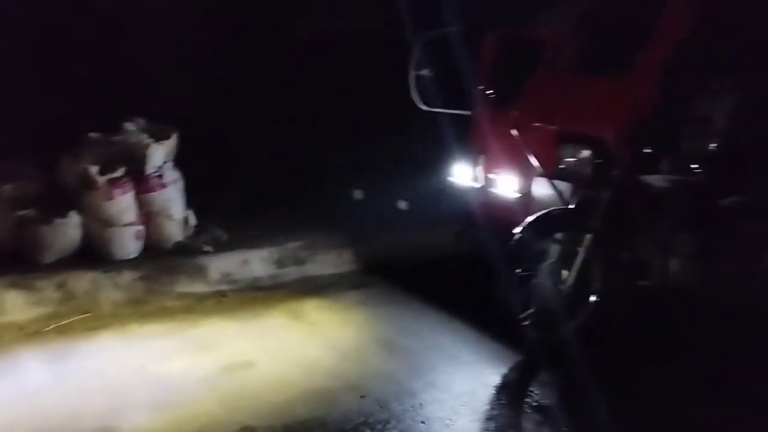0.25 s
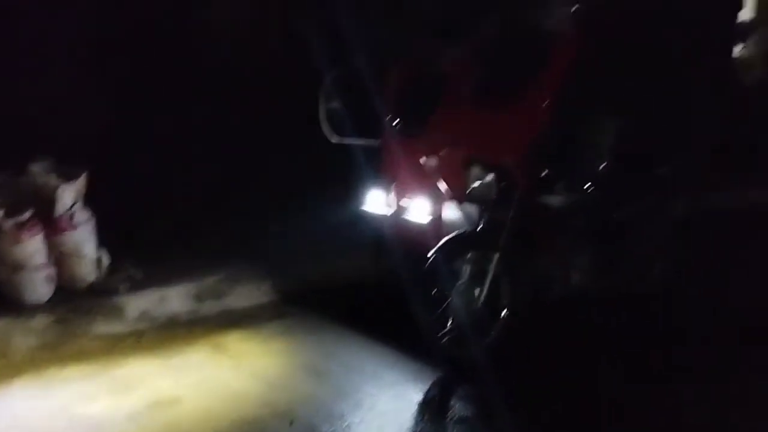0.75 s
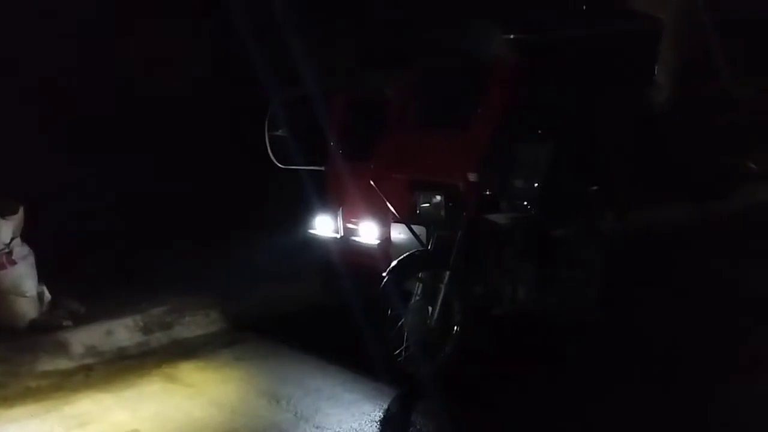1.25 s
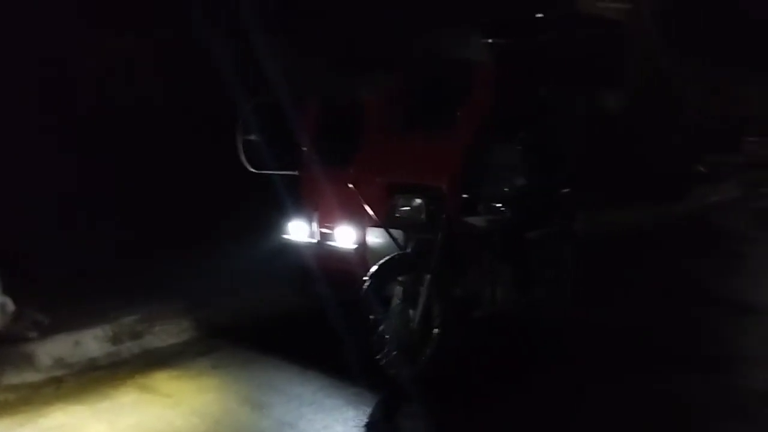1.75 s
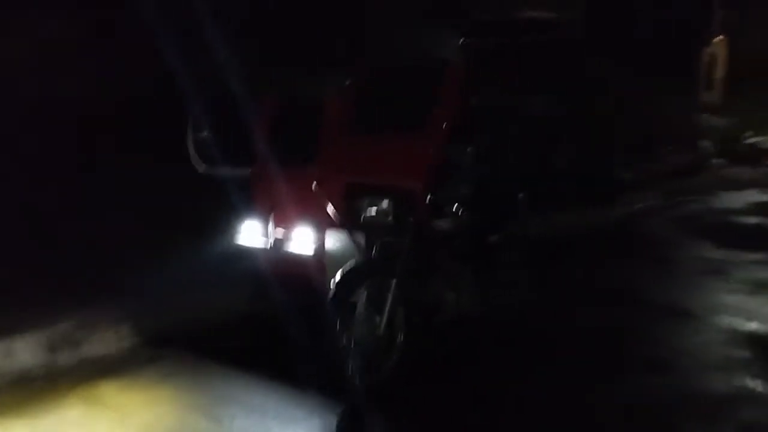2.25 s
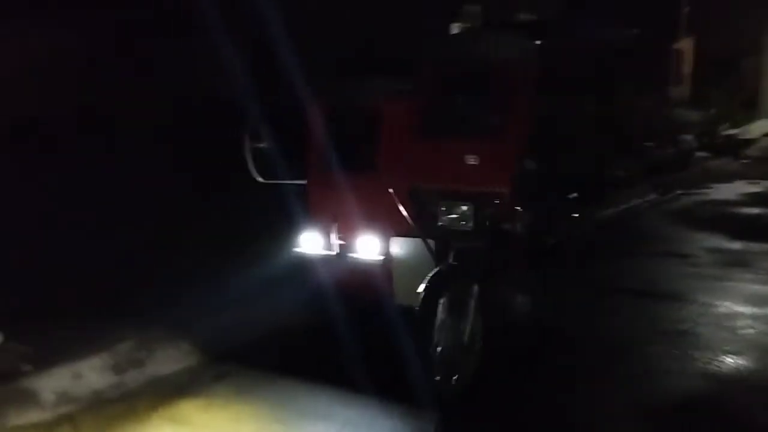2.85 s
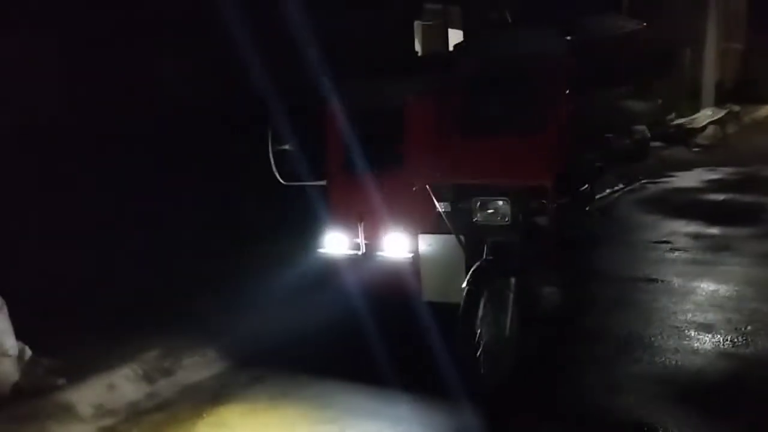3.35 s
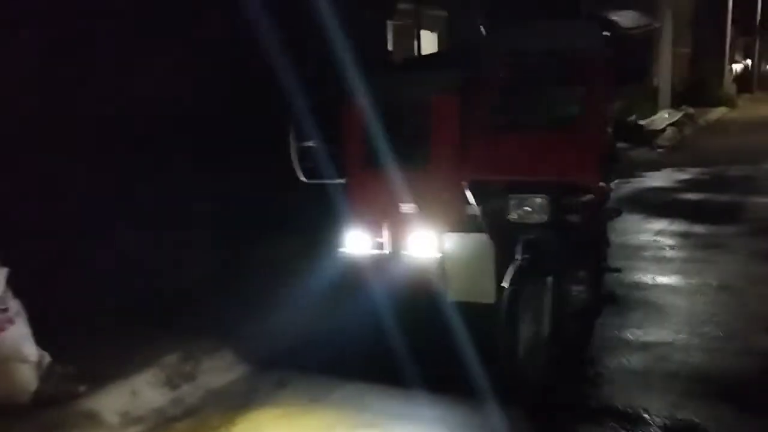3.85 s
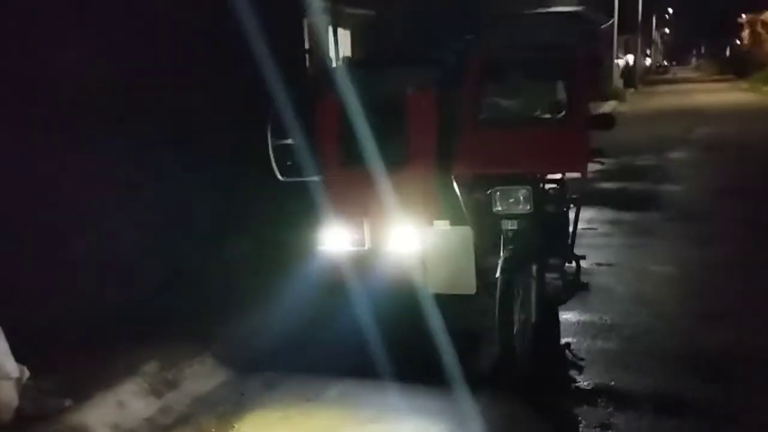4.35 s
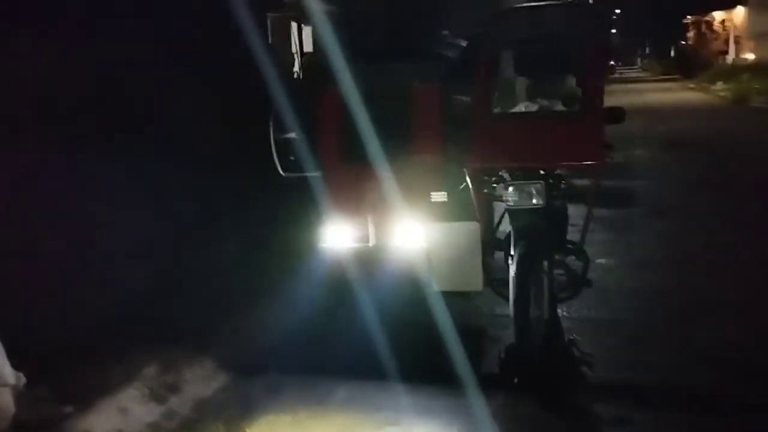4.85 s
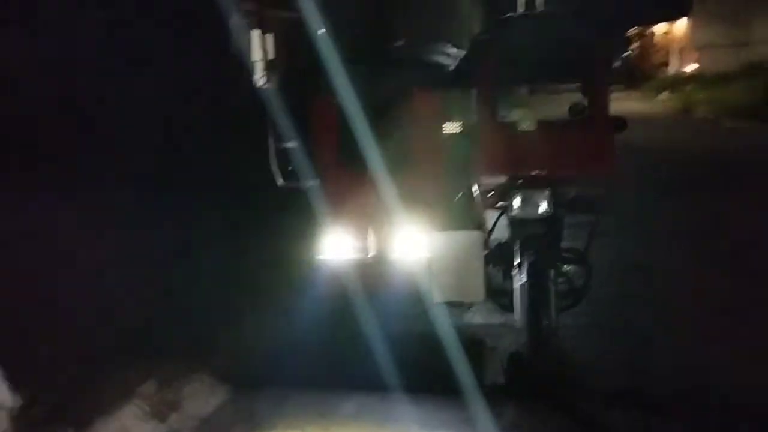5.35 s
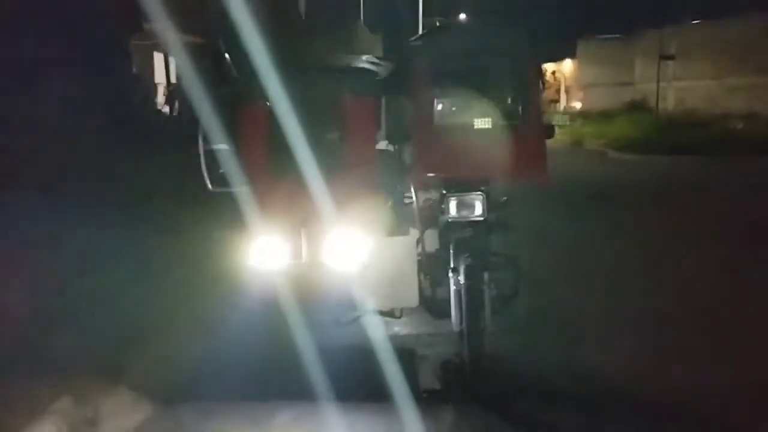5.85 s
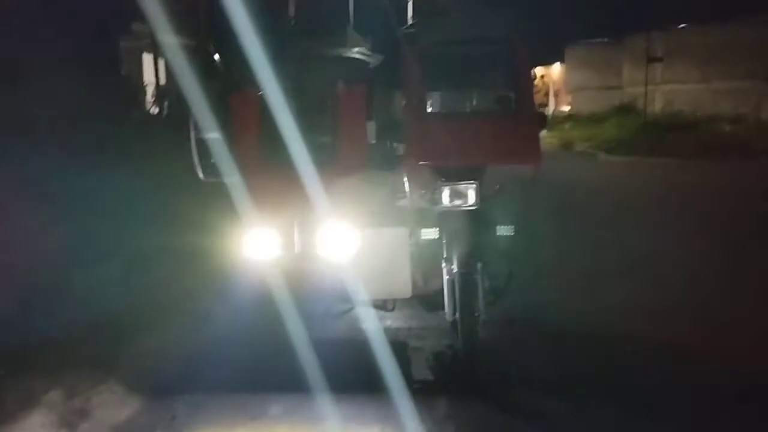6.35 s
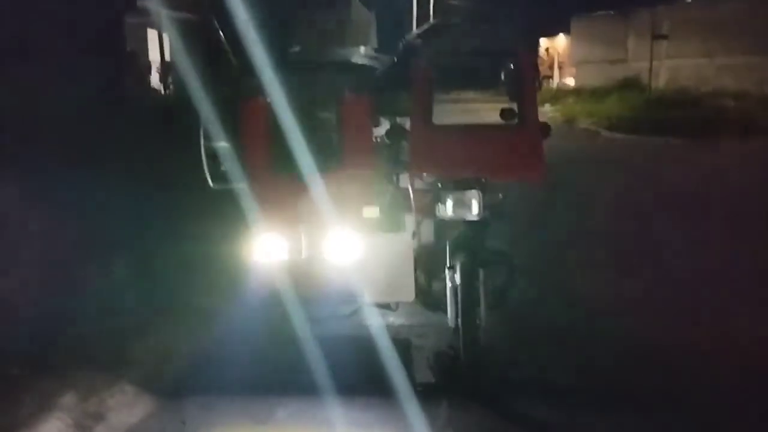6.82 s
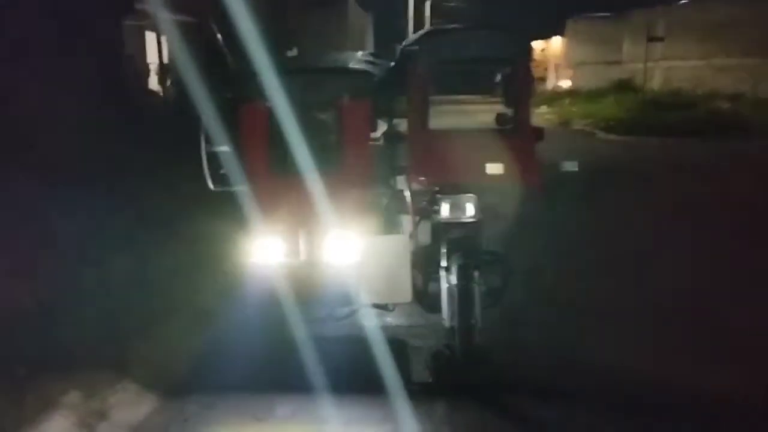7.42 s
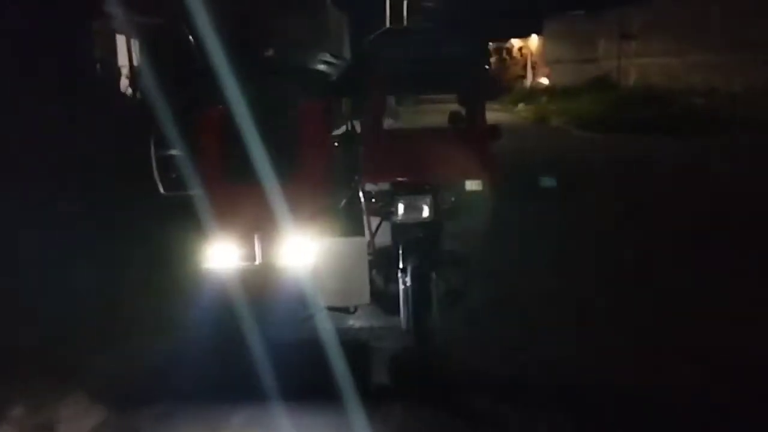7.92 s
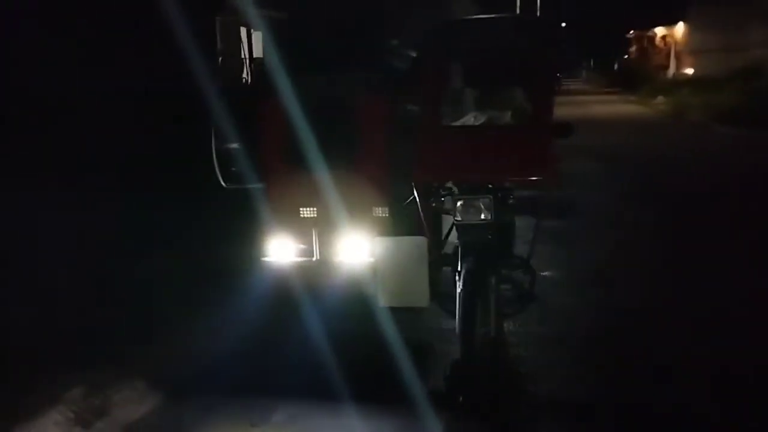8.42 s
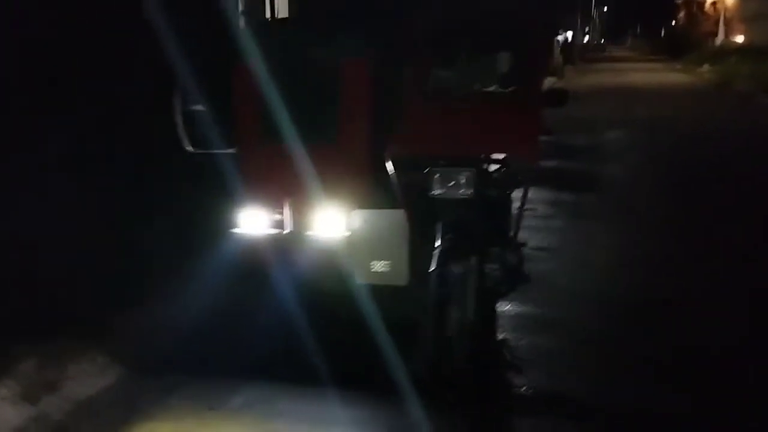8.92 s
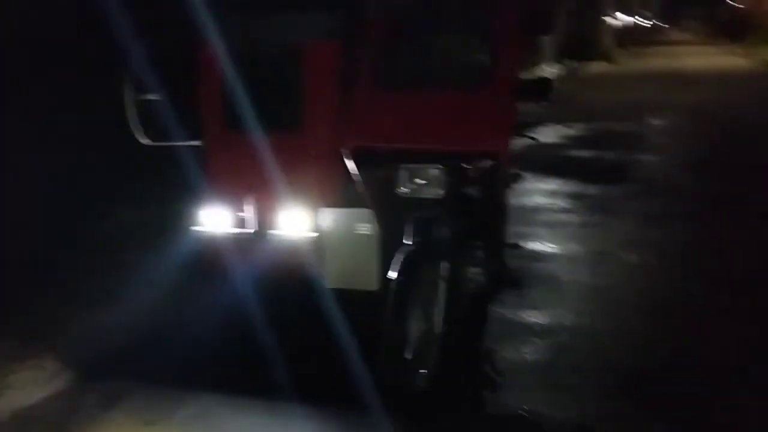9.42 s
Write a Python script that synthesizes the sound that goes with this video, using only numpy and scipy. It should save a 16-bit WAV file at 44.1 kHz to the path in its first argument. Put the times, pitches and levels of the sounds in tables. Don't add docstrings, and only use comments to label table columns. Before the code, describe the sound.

Slow thudding tricycle idle, high insect buzz and gritty footsteps at night; a bigger motor's drone swells into a raspy, roaring pass.

```python
import sys
import numpy as np
from scipy import signal
from scipy.fft import rfft, irfft
from scipy.io import wavfile
from scipy.ndimage import uniform_filter1d

SR = 44100
rng = np.random.default_rng(int(sys.argv[2]) if len(sys.argv) > 2 else 0)


def materialize(psi):
    bounded = np.clip(np.atleast_2d(psi).T, -1, 1)
    quanta = np.round(bounded * 32767).astype(np.int16)
    wavfile.write(sys.argv[1], SR, quanta)


def elevation(decibels):
    levels = np.asarray(decibels, float)
    return 10 ** (levels / 20)


N = 426888
T = np.arange(N) / SR
HZ = np.fft.rfftfreq(N, 1 / SR)

# freq_hz, likeness_share
PORT_LIKENESS = [(60, 0.98), (130, 0.98), (290, 0.96), (640, 0.74), (1410, 0.3), (3100, 0.01), (6820, 0.01),
                 (15000, 0.01)]
# time_s, level_db
RASP_LEVEL = [(0, -85), (2, -79), (3, -59), (3.6, -55), (4.1, -49.5), (4.5, -54), (5, -65), (5.9, -57),
              (6.6, -35.5), (6.9, -32), (7.8, -34.5), (8.1, -34.5), (8.7, -37), (9.1, -39.5), (9.68, -45.5)]


def evened(x):
    return x / np.sqrt(np.mean(x ** 2) + 1e-20)


def read(points, hz):
    f, value = np.transpose(points)
    return np.interp(np.log(hz + 1), np.log(f + 1), value)


def curve(rows):
    s, *columns = np.transpose(rows)
    return np.array([np.interp(T, s, c) for c in columns])


def soft_step(at_s, width_s):
    return 0.5 + 0.5 * np.tanh((T - at_s) / width_s)


def swelling(rows):
    edge = 3.76
    return sum(elevation(db) * np.exp(-abs((T - s) / half_s) ** edge) for s, half_s, db in rows)


def drift(hz):
    knots = rng.standard_normal(2000)
    return evened(uniform_filter1d(np.interp(T * hz, np.arange(2000), knots), 400))


def band(x, hz, width_hz):
    b, a = signal.iirpeak(min(hz, SR * 0.45), hz / width_hz, SR)
    return signal.lfilter(b, a, signal.lfilter(b, a, x))


def coloured(x, db):
    ramp = x[..., :1] + (x[..., -1:] - x[..., :1]) * T / T[-1]
    return irfft(rfft(x - ramp) * elevation(db), N) + ramp * elevation(db)[..., :1]


def shifting(x, tails, hz):
    turn = 2 * np.pi * (hz * T + rng.random()) + 0.72 * drift(hz + 0.5)
    shares = np.cos(turn), np.sin(turn)
    return sum(signal.oaconvolve((x * share)[None], tail, axes=1)[:, :N]
               for share, tail in zip(shares, tails))


def ports(x, step_hz=90):
    wander = np.interp(HZ, np.arange(300) * step_hz, rng.standard_normal(300))
    turn = (0.06 + 1.26 * (1 - np.clip(read(PORT_LIKENESS, HZ), 0, 1))) * wander
    room = np.pad(x, (0, 2000), "linear_ramp", end_values=x[0])
    turn = np.interp(np.fft.rfftfreq(len(room), 1 / SR), HZ, turn)
    return irfft(rfft(room) * np.exp(1j * np.array([turn, -turn])), len(room))[:, :N]


def air():
    # freq_hz, density_db
    air_spectrum = [(12, -56), (20, -21), (43, -49), (81, 1), (107, -9), (148, -10), (205, -12), (480, -33),
                    (620, -34.5), (991, -27.5), (1630, -38), (2000, -39), (4790, -44.5), (6310, -48.5),
                    (7150, -39.5), (7900, -55), (10300, -105), (17400, -120)]
    level_db = -40
    frames, hz = N // 512 + 5, np.fft.rfftfreq(2048, 1 / SR)
    a, b, c, d, patches = rng.standard_normal((frames, 1025, 5)).T
    patches = evened(uniform_filter1d(uniform_filter1d(patches, 20, 0), 8, 1))
    same = np.clip(read(PORT_LIKENESS, hz), 0, 1)[:, None]
    left = a + 1j * b
    right = same * left + np.sqrt(1 - same ** 2) * (c + 1j * d)
    z = np.array([left, right]) * elevation(read(air_spectrum, hz)[:, None] + 1.9 * patches)
    return elevation(level_db) * evened(signal.istft(z, nperseg=2048, noverlap=1536)[1][:, :N])


def idle_thumps(cycles):
    # freq_hz, level_db, t60_s
    thump_modes = [(46.1, 0.5, 0.17), (95.6, 1, 0.16), (138.2, 2, 0.11), (199.1, 0, 0.1), (325, -20, 0.062),
                   (768, -12.5, 0.055)]
    shell_hz, shell_late_s = 300, 0.014
    chance = rng.standard_normal((100, 2 + len(thump_modes)))
    since = [np.maximum(T[:8000] - shell_late_s * (hz > shell_hz), 0) for hz, db, t60 in thump_modes]
    thumps = np.zeros(N + 8000)
    for at, (late, force, *turn) in zip(np.flatnonzero(np.diff(np.floor(cycles))), chance):
        at = max(at + int(late * 0.0015 * SR), 0)
        rings = 0
        for (hz, db, t60_s), t, p in zip(thump_modes, since, turn):
            rise = (1 - np.exp(-t / 0.003)) ** 2
            rings = rings + elevation(db - 60 * t / t60_s) * np.sin(2 * np.pi * hz * t + 0.22 * p) * rise
        thumps[at:at + 8000] += elevation(0.9 * force) * rings
    return elevation(-40.5) * evened(thumps[:N])


def idle_puffs(cycles):
    gas = np.exp(-(cycles % 1) / 0.9) * rng.standard_normal(N)
    return elevation(-49.5) * evened(band(gas, 140, 300))


def idle_clatter(cycles):
    # start_cycles, level_db, decay_cycles
    knocks = [(0.02, 1.5, 0.13), (0.162, 2.5, 0.18), (0.42, 1, 0.062), (.77, 3.5, 0.27), (0.902, -4, 0.08)]
    # freq_hz,
    # width_hz, level_db
    casing = [(307.4, 100, 6), (324.4, 9.7, 0.5), (860, 240, 1.5), (1010, 186, 6.5), (1102, 28, -0.5),
              (1354, 190, -3.5)]
    # freq_hz, width_hz, level_db
    head = [(1955, 530, 6), (2600, 500, 3.5), (3920, 2130, 5), (5250, 1500, -6)]
    # time_s, nearness_db
    walk = [(0, -1), (1, 2), (2, -6), (3.2, -8.5), (4.2, -3), (5.5, -2.5), (7.5, -2), (9.68, 1)]
    gate = 0.29 + sum(elevation(db) * np.exp(-((cycles - at) % 1) / fall) for at, db, fall in knocks)
    near_db = curve(walk)[0]
    out = np.zeros(N)
    for modes, start_db, turn_db_per_s in ((casing, -50.5, 0.2948), (head, -65, 0.5453)):
        rattle = gate * elevation(0.9 * drift(40)) * rng.standard_normal(N)
        rung = sum(elevation(db) * evened(band(rattle, hz, width_hz)) for hz, width_hz, db in modes)
        out += elevation(near_db + start_db + turn_db_per_s * T) * evened(rung)
    return out


def idler():
    # time_s, delay_ms
    idle_delay = [(0, 83), (2.3, 86), (3.5, 99), (4, 93), (5, 92), (6, 97), (6.5, 106), (7.5, 106),
                  (8.5, 91), (9.68, 97)]
    firings_per_s = 9.37
    cycles = (T - curve(idle_delay)[0] / 1000 + 0.0135) * firings_per_s
    return idle_thumps(cycles) + idle_puffs(cycles) + idle_clatter(cycles)


def katydids():
    # strokes_per_s, left_db, right_db
    insects = [(230.4, -57, -56), (233, -55, -60), (232, -59, -61), (229.3, -59, -60), (233.8, -60, -61)]
    # freq_hz, level_db
    wing = [(8000, -28.5), (9000, -23.5), (10000, -21.5), (11200, -18.5), (12300, -10.5), (13200, -4.5),
            (14200, -0.5), (15500, -6.5)]
    fall = np.exp(-T[:300] / 0.0023)
    out = np.zeros((2, N))
    for rate_hz, *side_db in insects:
        strokes = np.cumsum(rate_hz * (1 + 0.002 * drift(3.4) + 0.002 * drift(150))) / SR
        scrape = rng.standard_normal((2, 2, 300)) * fall
        beat = np.diff(np.floor(strokes), prepend=0)
        tone = shifting(beat, scrape, 0.1695)
        hiss = signal.oaconvolve(beat, fall)[:N] * rng.standard_normal((2, N))
        level_db = np.array(side_db)[:, None] + 0.92 * drift(1.43)
        out += elevation(level_db) * (1.81 * evened(tone) + 0.8 * evened(hiss))
    return coloured(out, read(wing, HZ) - 80 * (HZ < 7700) + 10.85)


def exhaust_drone(turns, speed_hz):
    # time_s, level_db
    firing_tone = [(0, -59), (1.2, -45), (1.65, -43), (2.7, -67), (3.2, -39), (3.55, -63), (3.8, -37.5),
                   (4.75, -39.5), (5.05, -45), (5.4, -32), (5.7, -31.5), (6.25, -36), (6.8, -26.5),
                   (7.45, -20.5), (7.9, -26.5), (8.25, -25), (8.68, -29), (9.68, -21)]
    # middle_s, half_length_s, level_db
    swells_2 = [(0.1, 0.21, -41), (0.6, .08, -46), (1.05, 0.21, -37), (1.35, 0.11, -32.5),
                (1.7, 0.23, -27.5), (2.15, .17, -28), (2.4, 0.11, -36), (2.92, 0.24, -29),
                (3.36, 0.19, -31.5), (4.15, 0.38, -28.5), (5.1, 0.43, -34.5), (5.7, 0.22, -40.5),
                (6.15, 0.28, -31), (6.68, .33, -27.5), (7.35, 0.36, -31), (8.0, 0.32, -34),
                (8.8, 0.33, -42.5), (9.3, 0.14, -40)]
    # middle_s, half_length_s, level_db
    swells_3 = [(4.8, 0.071, -45), (6.75, 0.3, -35), (7.42, 0.09, -36.5), (7.8, 0.14, -44),
                (8.55, 0.11, -49), (9.5, 0.16, -47)]
    lead_far_ms, lead_near_ms = 0.47, -0.03
    lead_ms = lead_far_ms + (lead_near_ms - lead_far_ms) * soft_step(4.8, 0.6)
    heard = turns + np.array([[0.5], [-0.5]]) * speed_hz * lead_ms / 1000
    orders = elevation(curve(firing_tone)[0]), swelling(swells_2), swelling(swells_3)
    return sum(np.sqrt(2) * size * np.sin(2 * np.pi * k * heard + 1.35 * k)
               for k, size in enumerate(orders, 1))


def exhaust_rasp(turns):
    # freq_hz, width_hz, level_db
    pipe = [(226, 79, -7.5), (362, 380, -8), (516.3, 53, -0.5), (582.4, 72, -6), (712, 430, -10.5),
            (1002, 190, -13)]
    late_beats = 0.047 * (1 - np.exp(-((T - 7.1) / 0.9) ** 4))
    which = (np.floor(turns / 2) + np.floor((turns + 1 - late_beats) / 2)).astype(int)
    force = elevation(5.0 * (which % 2) + 0.8 * rng.standard_normal(700)[which])
    puffs = (0.5 + np.exp(-(turns % 1) / 1.1)) * rng.standard_normal(N)
    drive = evened(np.diff(which, prepend=0) * force) + 0.68 * evened(puffs)
    echoes = (rng.random((2, 1, 4000)) < 0.02) * rng.standard_normal((2, 1, 4000))
    walls = echoes * elevation(-60 * T[:4000] / 0.25)
    drive = drive + 0.75 * evened(shifting(drive, walls, 0.6)[0])
    rasp = sum((-1) ** k * elevation(db) * evened(band(drive, hz, width_hz))
               for k, (hz, width_hz, db) in enumerate(pipe))
    lift_db = -0.5 + 7 * soft_step(8.2, 0.34)
    rasp += (elevation(lift_db) - 1) * band(rasp, 565, 90)
    coming = 1 - soft_step(6.52, 0.15)
    rasp += (elevation(8) - 1) * coming * band(rasp, 559, 56)
    return ports(elevation(curve(RASP_LEVEL)[0]) * evened(rasp))


def passer():
    # time_s, rate_hz
    firing_rate = [(0, 45.8), (0.75, 44.3), (1.2, 45.99), (1.6, 47.0), (2.0, 47.7), (2.4, 49.0),
                   (3.6, 51.4), (4.4, 52.99), (4.9, 53.47), (6.1, 53.5), (6.6, 55.1), (6.9, 56.2),
                   (7.05, 57.5), (7.27, 58.3), (7.42, 57.0), (7.7, 58.8), (8.8, 60.6), (9.68, 62.9)]
    speed_hz = curve(firing_rate)[0] * (1 + 0.003446 * drift(25))
    turns = np.cumsum(speed_hz) / SR
    return exhaust_drone(turns, speed_hz) + exhaust_rasp(turns)


def tyres():
    # freq_hz, density_db
    roar_colour = [(200, 8.5), (400, -6.5), (750, 3), (1100, -7), (1600, -7), (2300, -19.5), (3500, -42),
                   (6000, -35.5)]
    rasp_db = curve(RASP_LEVEL)[0]
    thin_db = 9 * np.maximum(T - 7.65, 0)
    roar_db = -43 + 0.61 * (rasp_db - rasp_db.max()) - thin_db
    roar = coloured(rng.standard_normal(N), read(roar_colour, HZ) - 60 * (HZ < 150))
    return ports(elevation(roar_db + 0.68 * drift(18)) * evened(roar))


def scuffs():
    # start_s, length_s, level_db, centre_hz
    drags = [(0.58, 0.13, -57, 3020), (1.033, 0.026, -53.5, 4500), (1.761, 0.044, -58.5, 5000),
             (2.413, 0.029, -51, 3400), (2.461, 0.15, -59, 3240), (3.009, 0.031, -51, 4030),
             (3.071, 0.099, -58, 2430), (3.732, 0.12, -56, 3450), (4.282, 0.12, -57.5, 3340),
             (4.873, 0.1, -58.5, 2970), (5.466, 0.11, -56, 3000), (5.646, 0.05, -45.5, 5300),
             (5.849, 0.033, -50.5, 4530), (8.064, 0.089, -61, 6030), (8.88, 0.017, -55, 3970),
             (9.557, 0.061, -55.5, 4600)]
    out = np.zeros(N)
    for s, length_s, db, hz in drags:
        shape = np.clip((T - s) / 0.0065, 0, 1) * np.exp(-np.clip((T - s) / length_s, 0, 9) ** 4)
        near = slice(int(s * SR), int((s + 0.25) * SR))
        grit = rng.standard_normal((3, int(0.25 * SR) + 1))[:, :len(T[near])]
        grains = grit[0] * (0.35 + (grit[1] > 2.4) * elevation(5.0 * abs(grit[2])))
        out[near] += elevation(db) * shape[near] * evened(band(grains, hz, 1.84 * hz))
    return out


def stones():
    # start_s, peak_db, freq_hz
    snaps = [(0.5691, -38, 2930), (2.4266, -43, 1880), (2.4812, -41, 2210), (3.0453, -38, 4200),
             (3.0974, -40.5, 2250), (3.18, -37.5, 4170), (3.251, -39, 3400), (3.7126, -36, 3280),
             (3.7756, -35, 2100), (3.7922, -37, 2610), (4.344, -38, 2320), (4.5106, -56, 1630),
             (5.0092, -44, 1940), (5.464, -36.5, 3200), (5.661, -53, 2650), (8.3523, -44, 2000),
             (9.0324, -38, 1900)]
    # start_s, peak_db, freq_hz
    pebble = [
        (8.1990, -20, 14800),
        (8.2000, -31, 1900),
        (8.2035, -34, 8000),
        (8.2026, -26, 3700),
    ]
    # start_s, peak_db, freq_hz
    loose = [
        (1.033, -38.5, 4260),
        (8.933, -40, 2600),
        (9.141, -45.5, 1960),
    ]
    out = np.zeros(N)
    for rows, crack_s, width_share in ((snaps, 0.0009, 0.7), (pebble, 0.0006, 0.99), (loose, 0.003, 0.2)):
        for s, db, hz in rows:
            crack = rng.standard_normal(400) * np.exp(-T[:400] / crack_s)
            snap = band(crack, hz, width_share * hz)
            out[int(s * SR):][:400] += elevation(db) * snap / abs(snap).max()
    return out


def gated(x):
    gate_db, shared_hz = -91.3, 7600
    padded = np.pad(x, ((0, 0), (0, 3000)), "reflect")
    hz, t, z = signal.stft(padded, SR, nperseg=2048, noverlap=1024, boundary="even")
    hz = hz[:1024, None]
    power = (abs(z[:, :1024]) ** 2).reshape(2, 256, 4, -1).mean(axis=2).repeat(4, axis=1)
    power = uniform_filter1d(power, size=2, axis=2)
    power[1] = np.where(hz < shared_hz, power[0], power[1])
    z[:, :1024] *= (power > elevation(2 * gate_db)) | (hz < 4000)
    return signal.istft(z, SR, nperseg=2048, noverlap=1024)[1][:, :N]


def scene():
    machine = ports(idler())
    shoes = ports(scuffs() + stones(), step_hz=254.8)
    return machine + shoes + passer() + tyres() + air() + katydids()


def roll_off(x):
    return signal.sosfilt(signal.butter(12, 16640, fs=SR, output="sos"), x)


def record(dry):
    # freq_hz, left_db, right_db
    side_colour = [(200, 0, 0), (400, -.5, .5), (700, -.4, .4), (1300, -2, 2),
                   (2280, 0, 7), (4240, 1, 5), (7625, -2, 0), (7500, -27.5, -24), (7900, -6.5, -32),
                   (9270, -2.5, -14), (9870, 0.5, -1), (11400, -4.5, -22), (12550, -2.5, -13.5),
                   (13600, -2.5, -4.5)]
    edge_hz = 15600
    hz, *side_db = np.transpose(side_colour)
    colour_db = np.array([np.interp(HZ, hz, db) for db in side_db]) - 90 * (HZ > edge_hz)
    fade = np.minimum((T[-1] - T) / 0.0037, 1)
    mix = gated(coloured(dry, colour_db)) * fade
    return roll_off(mix)


dry = scene()
out = record(dry)
materialize(out)
```